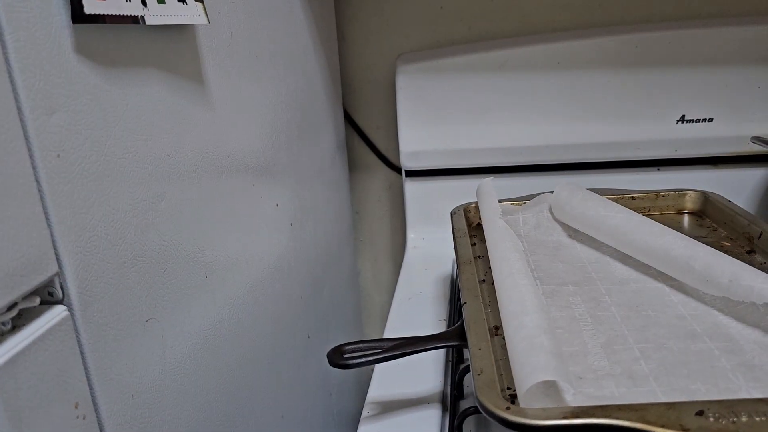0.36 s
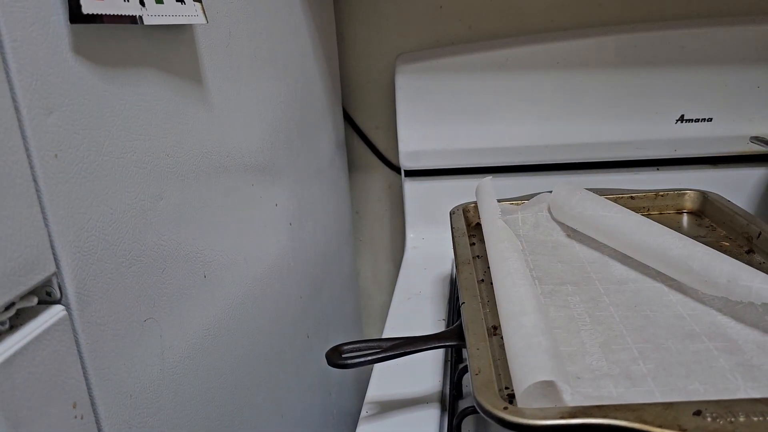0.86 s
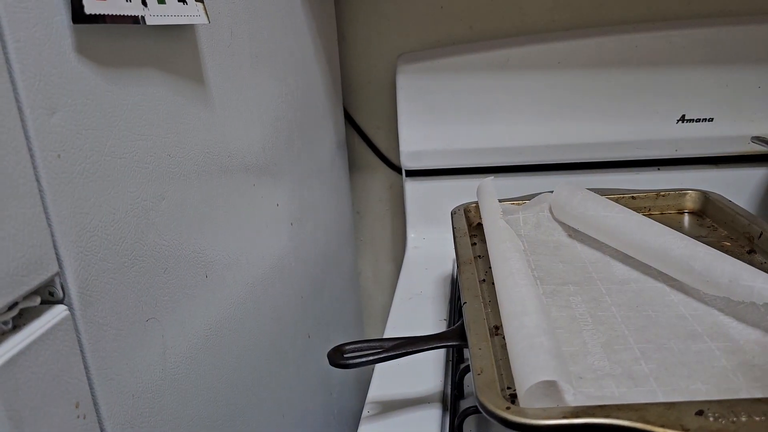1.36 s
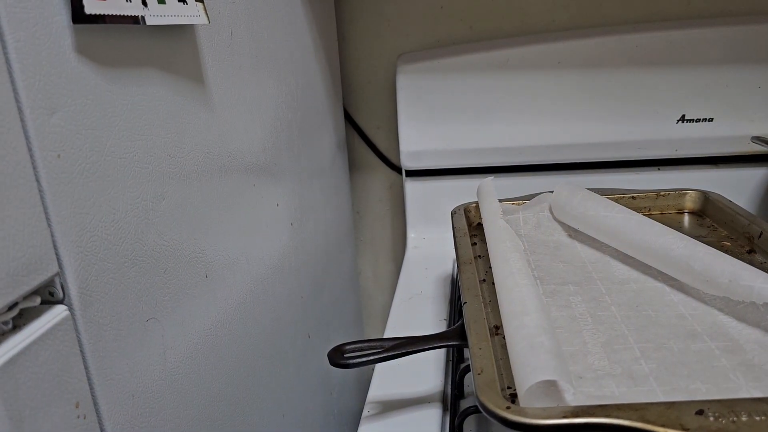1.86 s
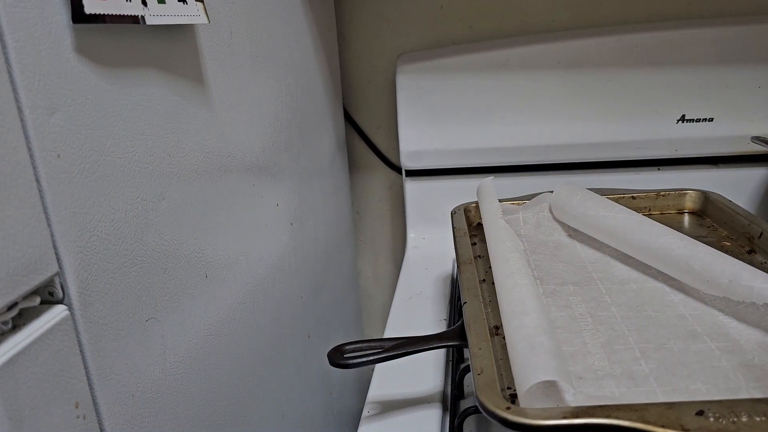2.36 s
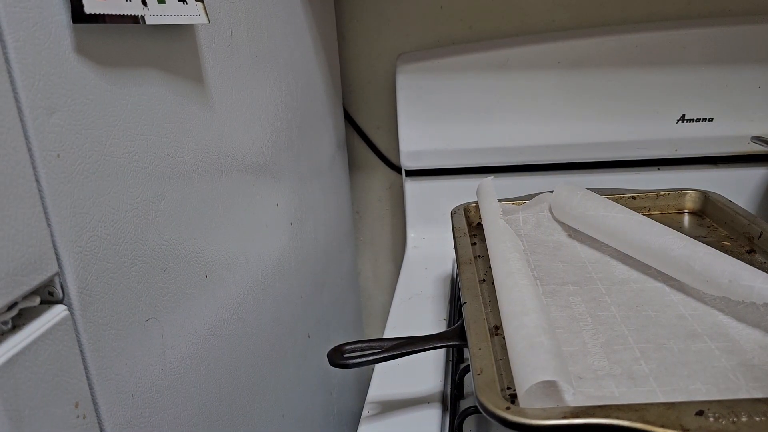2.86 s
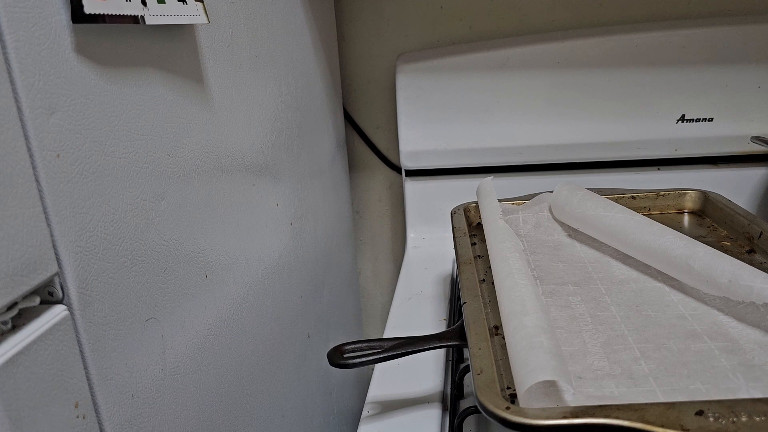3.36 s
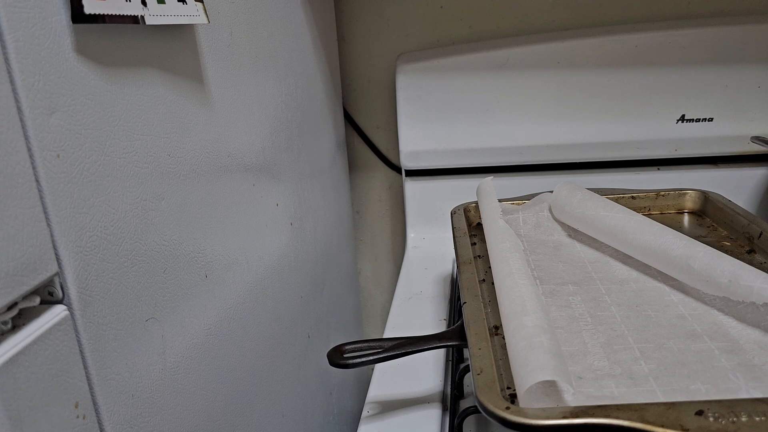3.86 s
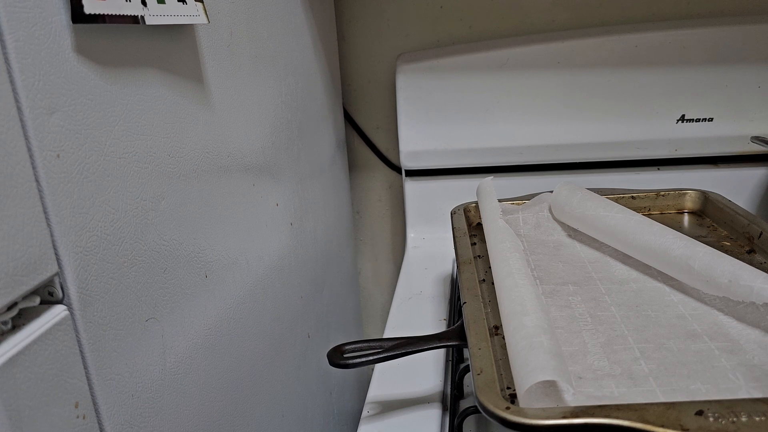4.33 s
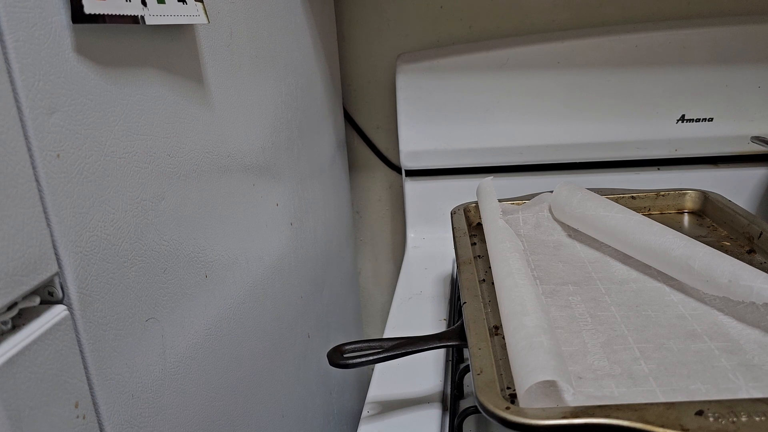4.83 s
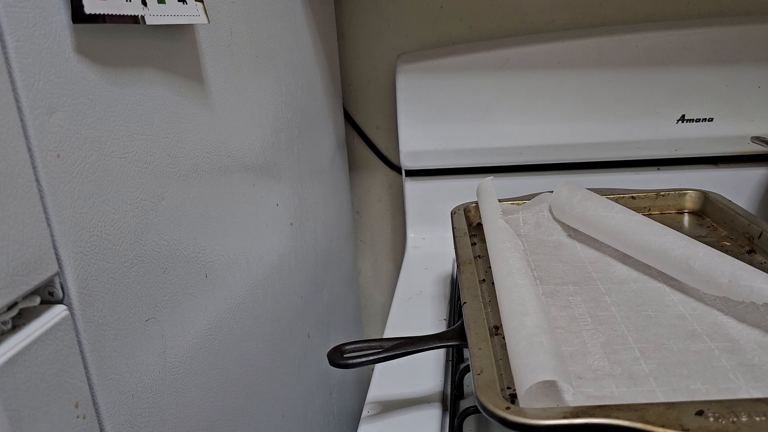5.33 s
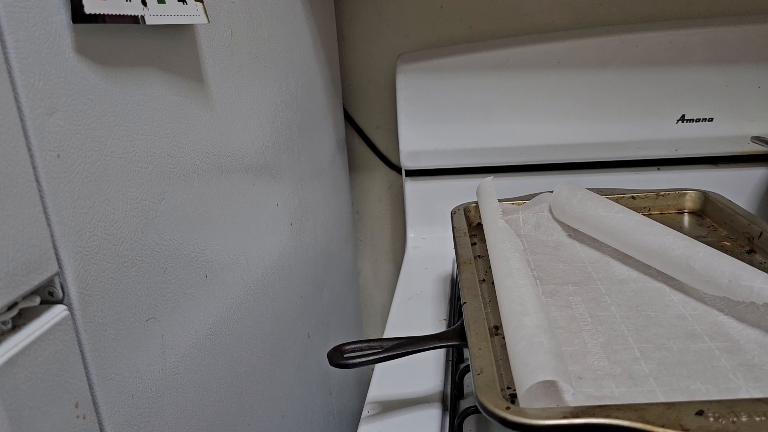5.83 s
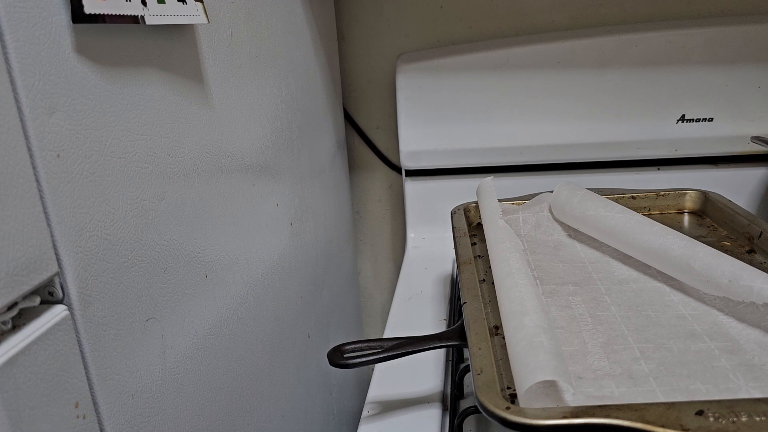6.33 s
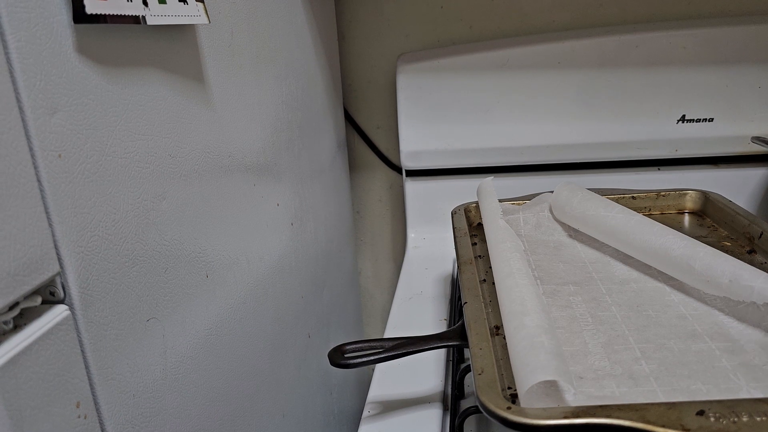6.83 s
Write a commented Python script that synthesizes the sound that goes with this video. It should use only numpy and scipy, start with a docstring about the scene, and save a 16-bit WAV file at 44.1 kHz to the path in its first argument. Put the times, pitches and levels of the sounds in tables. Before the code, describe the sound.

A small kitchen heard close up, with a faint steady fridge hum and low house rumble throughout. Paper brushes lightly at the start; at 0.3-0.5 s a metal lid clatters shut in several hard, bright blows, ringing briefly over deep thuds. A soft low push of air comes near 0.85 s, with short squeaks and shuffling from 0.8 to 1.7 s. At 1.78 s something is set down with a sharp, hollow-ringing knock. Quiet taps, clicks and paper strokes follow, with a tap at 2.56 s, a smooth sweep near 3.1 s and a click at 4.5 s. From 5.5 to 6.2 s a thin tray knocks and scrapes amid stronger rustling. A sharp tap at 6.34 s, tiny squeaks, a crisp rustle at 6.77 s and a soft thud near 6.97 s finish it. One channel is crisp and hissy, the other muffled.

```python
"""Clatter in a small kitchen

A metal lid clatters shut on a cupboard, hinges squeak and things are set down on the counter: bursts of noise,
ringing modes and gliding tones. Hands brush over paper and scrape a thin tray: noise that swells, fades and
flickers. A fridge hums in steady low tones over a rumble. One microphone port is open and its noises
are strongest near 6 kHz; the other is covered and hears the sound late and muffled."""
import sys
import numpy as np
from scipy import signal
from scipy.fft import rfft, irfft, next_fast_len
from scipy.io import wavfile

SR = 44100
rng = np.random.default_rng(int(sys.argv[2]) if len(sys.argv) > 2 else 0)


def to_wav(s):
    """Save 16-bit WAV."""
    ch = np.atleast_2d(s).T  # columns
    pcm = np.round(np.clip(ch, -1, 1) * 32767)  # PCM
    wavfile.write(sys.argv[1], SR, pcm.astype(np.int16))


def magnitude_from_level(level_db):
    """Linear magnitude for a level in decibels (20 dB per decade)."""
    exponent = np.asarray(level_db, float) / 20
    return 10 ** exponent


N = 317079   # length in samples
HZ = np.maximum(np.arange(next_fast_len(N) // 2 + 1) * SR / next_fast_len(N), 1)   # frequencies of the filters


# knocks of lid and things: t/s, level/dB at 3.5-10 kHz (scene() adds 2), then body, edge and air/dB against it
KNOCKS = [(0.0485, -49.5, -1.5, -0.5, -18), (0.1501, -44.5, -6.5, -10, -21), (0.3097, -16.5, -19, -10, -10),
          (0.3334, -28, -6.5, -18, -33), (0.378, -25.5, -27, -7.5, -9), (0.4753, -34.5, -1.5, 6, -13),
          (0.5057, -21, -10, -10, -17), (0.5124, -28, -15, -9, -12), (0.76, -37.5, -6.5, -5, -31),
          (1.7757, -26.5, -13, -3.5, -17), (2.5627, -35.5, -6.5, -6, -19), (2.7856, -52, -22, -14, -15),
          (5.0564, -59.5, 3.5, 1, -28), (5.1316, -51.5, -6.5, -8, -24), (5.5248, -27.5, -53, -12, -9),
          (5.5382, -28.5, -35, -25, -18), (5.5494, -42, -20, -26, -29), (5.726, -43.5, -6.5, -21, -13),
          (5.8065, -37.5, -18.5, -13, -12), (5.9, -32, -38, -9.5, -17), (6.1125, -35.5, -31, -5, -30),
          (6.6094, -56.5, 6, -25, -29), (6.763, -41.5, -34, -13, -8)]


def knocks():
    """Two hard things stay in contact for several ms, which makes a short burst of noise."""
    return contacts(KNOCKS, contact_ms=3.26)


# sharp clicks: t/s, level/dB at 3.5-10 kHz, then body, edge and air/dB against it
CLICKS = [(0.377, -15, -18, -10.5, -32), (0.5997, -40.5, -8, -5, -4), (1.7781, -20.5, -15.5, -3, -31),
          (1.7894, -40, -12, -13, -29), (2.136, -45.5, -5.5, -11, -23), (2.1745, -48.5, -2.5, -7, 2),
          (2.71, -55, -1, -3, -16), (3.3477, -55, -13, -14, -9), (4.138, -39.5, -12.5, -5, -40),
          (4.4777, -31, -46, -25, -38), (5.1579, -33, -36, -12.5, -44), (6.342, -26, -18.5, -4.5, -25),
          (6.9654, -49, -15, 1.5, -21.5)]


def clicks():
    """A shorter contact makes a sharper burst."""
    return contacts(CLICKS, contact_ms=1.51)


# bands of a contact, in the order main, body, edge, air, boom: low f/Hz, high f/Hz
CONTACT_BANDS = [(3500, 10300), (350, 1200), (1200, 3500), (10300, 16000), (130, 350)]
# room tail, one value for each of these bands: t60/s
TAIL_T60 = [0.29, 0.44, 0.38, 0.21, 0.64]
# strength of that tail against a contact, for each band: level/dB, before the scaling by contact time
TAIL_LEVEL = [-7, 1, -7, -6, 2.5]


def contacts(events, contact_ms):
    """Each contact is a short burst; its power then lingers as a room tail that builds up and dies by band."""
    age = np.arange(SR // 8) / SR / (contact_ms / 1000)   # counted in contact times
    burst = np.minimum(age * 1.35, 1) ** 2 * np.exp(-age)
    s, level_db, body, edge, air = np.transpose(events)
    boom = body - 5.5   # the boom follows the body, dB
    rel_db = [0, body, edge, air, boom]
    out = 0
    for k, noise in enumerate(bands(port_noise(PORT), CONTACT_BANDS)):
        start = np.zeros(N)
        start[np.round(s * SR).astype(int)] = magnitude_from_level(2 * (level_db + rel_db[k]))
        contact = np.maximum(signal.oaconvolve(start, burst)[:N], 0)
        # half the t60, because power falls twice as fast as amplitude
        tail = dying(start, TAIL_T60[k] / 2) - dying(start, 0.015)
        tail = np.maximum(tail, 0) * contact_ms / 6
        out = out + noise * np.sqrt(contact + magnitude_from_level(2 * TAIL_LEVEL[k]) * tail)
    return out


# modes of the metal lid: f/Hz, level/dB, t60/s
LID = [(551, -3, 0.078), (603, 1.5, 0.13), (650, -4, 0.15), (830, -23, 0.25), (858, -19, 0.94),
       (1284, -17.5, 0.51), (1530, -17, 0.41), (2200, -16, 0.25), (2515, -6, 0.13), (3250, -7.5, 0.11),
       (3560, -25, 0.17), (3890, -14, 0.34), (4300, -3, 0.091), (5400, -19, .27), (5430, -21, 0.2),
       (5400, -15, 0.37), (6130, -11, 0.24), (6200, -19, 0.22), (6500, -21, 0.15), (6700, 4.5, 0.13),
       (6700, -4, 0.054), (7000, -20, 0.12), (7500, 0, 0.11)]
# blows on the lid: t/s, level/dB
LID_BLOWS = [(.310, -28), (.334, -31), (.377, -45), (.476, -41.5), (.504, -36)]


def lid():
    """The lid rings in its own modes at every blow."""
    return struck(LID, LID_BLOWS)


# modes of a small stiff object struck along with the lid: f/Hz, level/dB, t60/s
LATCH = [(4605, 0, .3), (4640, -8, .2), (4718, -5, .35)]
# blows on that object: t/s, level/dB
LATCH_BLOWS = [(0.33, -32), (0.38, -50), (0.478, -34), (0.504, -38)]


def latch():
    """A small stiff object, struck along with the lid, rings in a few high modes."""
    return struck(LATCH, LATCH_BLOWS)


# modes of another struck body: f/Hz, level/dB, t60/s
BLOCK = [(528, -8, 0.46), (664, 0, 0.56), (807, 9.5, 0.24), (954, 5, 0.24), (1384, -13, 0.11),
         (1530, -3, 0.17), (1753, -3.5, 0.14), (2000, 0, 0.15), (3240, -18, 0.33), (5530, -6, 0.3),
         (5510, -4, 0.41), (6140, 0, 0.19)]
# blows on that body: t/s, level/dB
BLOCK_BLOWS = [(1.777, -39), (1.79, -45)]


def block():
    """A struck body rings mostly in low and middle modes."""
    return struck(BLOCK, BLOCK_BLOWS)


def struck(modes, blows, rattle_s=0.00077):
    """Every blow is a brief rattle that sets each mode ringing with a strength of its own."""
    s, blow_db = np.transpose(blows)
    at = np.round(s * SR).astype(int)
    chance_db = rng.normal(0, 2.5, (len(blows), len(modes)))
    swell = np.exp(-1 / (rattle_s * SR))   # the ring swells over the rattle
    out = np.zeros(N)
    for k, (hz, level_db, t60) in enumerate(modes):
        hits = np.zeros(N)
        hits[at] = magnitude_from_level(blow_db + level_db + chance_db[:, k])
        hits += 1e-18   # keeps the filters away from vanishing numbers
        r, w = magnitude_from_level(-60 / (t60 * SR)), 2 * np.pi * hz / SR
        push = signal.lfilter([1], [1, -2 * r * swell * np.cos(w), (r * swell) ** 2], hits)
        ring = signal.lfilter([1], [1, -2 * r * np.cos(w), r * r], hits)
        out += np.sin(w) * (ring - push) * magnitude_from_level(3.5 * drift(50))   # the ring is uneven, dB
    return out


# squeaks of rubbing hinges and trays: start t/s, length/s, start f/Hz, end f/Hz, level/dB (scene() adds 4.5)
SQUEAKS = [(.81, 0.19, 1065, 1039, -45.5), (1.03, 0.14, 1041, 1126, -63), (1.15, 0.23, 522, 573, -55.5),
           (1.26, 0.054, 603, 608, -57), (1.325, 0.046, 614, 598, -58), (1.38, 0.18, 523, 528, -61.5),
           (1.58, 0.079, 547, 519, -60.5), (5.85, 0.13, 547, 565, -60), (6.035, .035, 530, 530, -71),
           (6.39, 0.115, 923, 960, -55), (6.45, 0.1, 650, 610, -57), (6.47, .16, 955, 1002, -54.5)]


def squeaks(octave_db=-17, catch_db=2.8, jitter=.02):
    """Stick-slip tones with a weak octave: a quick start, a slow sag, uneven in strength and pitch."""
    attack_s, release_s, sag_db_per_s = 0.016, 0.016, 43
    out, wobble, catch = np.zeros(N), drift(67.0), drift(40)
    for k, (s, length, start_hz, end_hz, db) in enumerate(SQUEAKS):
        at = np.arange(round(s * SR), round((s + length) * SR))
        age = at / SR - s
        own = (at + k * SR) % N   # each squeak reads another stretch of the chance curves
        hz = np.linspace(start_hz, end_hz, len(at)) * (1 + jitter * wobble[own])
        phase = 2 * np.pi * np.cumsum(hz) / SR
        fade = np.clip(np.minimum(age / attack_s, (length - age) / release_s), 0, 1)
        gain = np.sqrt(2) * fade * magnitude_from_level(db - sag_db_per_s * age + catch_db * catch[own])
        out[at] += gain * (np.sin(phase) + magnitude_from_level(octave_db) * np.sin(2 * phase))
    return out


# resonances of the thin tray: f/Hz, width/Hz, level/dB
TRAY = [(760, 99, -0.5), (1894, 36, 11.5), (2950, 140, 2), (3300, 91, 3.5), (4600, 38, -5), (4670, 36, -16),
        (5900, 60, -15)]


def tray(rough):
    """While the tray is dragged, the rough noises keep its resonances sounding."""
    start_s, end_s, fade_s = 5.5, 6.2, 0.022
    t = np.arange(N) / SR
    scrape = rough * np.clip(np.minimum(t - start_s, end_s - t) / fade_s, 0, 1)
    return sum(magnitude_from_level(level_db) * resonance(scrape, hz, width_hz) for hz, width_hz, level_db in TRAY)


# hands brush paper near by: peak t/s, rise/s, fall/s, level/dB at 5-10 kHz (scene() adds 4), pressure 0-1
BRUSHES = [(0.0, .02, 0.08, -54, 0.9), (.052, .01, 0.078, -52.5, 0.63), (.174, 0.034, 0.096, -45.5, 0.97),
           (.7, 0.091, 0.13, -62, 1), (.765, 0.023, 0.17, -47.5, 0.78), (1.204, 0.059, 0.13, -52.5, .02),
           (1.342, 0.05, 0.21, -60.5, 0), (1.546, 0.61, .3, -61.5, 0.82), (1.77, 0.1, .025, -51.5, 0.4),
           (2.182, 0.22, 0.14, -56, 0.4), (2.792, 0.1, .4, -57.5, 0.4), (3.06, .2, 0.18, -58, 0.1),
           (4.6, .1, 0.15, -60, 0.3), (4.875, 0.023, 0.095, -52, .1), (5.275, .025, .1, -52.5, .02),
           (5.522, 0.016, 0.034, -46, 0.68), (5.68, 0.072, 0.091, -61, 0.6),
           (5.728, 0.027, 0.063, -53, 0.4), (5.814, 0.029, 0.13, -44, 0.42), (6.61, .05, .06, -63, 0),
           (6.766, 0.011, 0.034, -41, .02), (6.8, .03, 0.15, -54, 0.3), (6.9, 0.19, 0.26, -61.5, 0.8)]
# their colour, one row for the lightest and one for the hardest pressure: level/dB in each rustle band
BRUSH_COLOUR = [(0, -41.5, -19.5, -13, -11), (0, 0, -0.5, -12.5, 0.5)]


def brushes():
    """Power of brushing hands: a harder press adds body to the hiss."""
    return strokes(BRUSHES, BRUSH_COLOUR, rise_shape=1.38, fall_shape=1.13)


# even sweeps of a sleeve or sheet: peak t/s, rise/s, fall/s, level/dB at 5-10 kHz (scene() adds 4), pressure 0-1
SWEEPS = [(3.07, 0.11, 0.13, -50, 0.072), (3.74, 0.14, 0.12, -60, 0.34), (4.72, 0.096, 0.076, -51, .05),
          (4.89, 0.045, 0.046, -57, .1), (5.33, .09, 0.13, -58, .05), (5.86, 0.1, 0.13, -44.5, 0.49),
          (6.21, 0.22, 0.16, -48.5, 0.19)]
# their colour, one row for the lightest and one for the hardest pressure: level/dB in each rustle band
SWEEP_COLOUR = [(0, -30, -23, -9.5, -10.5), (0, 5, -1, -13, -6)]


def sweeps():
    """Power of even sweeps, with a flat top."""
    return strokes(SWEEPS, SWEEP_COLOUR, rise_shape=3.2, fall_shape=3.2)


# shuffling noises with little air: peak t/s, rise/s, fall/s, level/dB at 350-1200 Hz (scene() adds 4), dryness 0-1
SHUFFLES = [(.96, 0.038, 0.11, -51, 0.17), (1.02, 0.24, 0.27, -56.5, 0.2), (1.204, 0.029, .2, -58, 0),
            (1.745, 0.074, 0.12, -55.5, 0.4), (1.97, .05, 0.07, -64, 0.4), (2.392, 0.0093, 0.024, -68, 0.9),
            (2.5, 0.056, 0.11, -59, 0.42), (2.73, .05, 0.057, -64, .2), (3.22, 0.073, 0.048, -74, 0.3),
            (3.3, 0.012, 0.085, -67, .1), (3.95, 0.022, .12, -66, 0.2), (4.138, .012, 0.026, -59, 1),
            (4.18, .05, 0.32, -69.5, 0.84), (5.96, 0.096, 0.16, -60, 1), (6.112, 0.051, 0.076, -51.5, 1),
            (6.42, 0.047, 0.12, -66.5, 0.95), (6.585, 0.044, 0.18, -67, 0.5), (6.75, 0.1, 0.06, -66, 0.96),
            (7.136, 0.085, 0.094, -60.5, 0.55)]
# their colour, one row for the dullest and one for the driest: level/dB in each rustle band
SHUFFLE_COLOUR = [(-23, 0.0042, -11.5, -22, -17), (5, 0, -1, -27, 2.5)]


def shuffles():
    """Power of duller or drier shuffling noises with little air; the drier, the more treble."""
    return strokes(SHUFFLES, SHUFFLE_COLOUR, rise_shape=1.38, fall_shape=1.13)


def strokes(rows, colour_db, rise_shape, fall_shape):
    """Power in each rustle band: every stroke swells and fades (shape 1 = pointed, 2 = round)."""
    t, power = np.arange(0, N + 32, 32) / SR, 0
    low_db, high_db = np.array(colour_db)
    for s, rise, fall, db, share in rows:
        before = (np.maximum(s - t, 0) / rise) ** rise_shape
        after = (np.maximum(t - s, 0) / fall) ** fall_shape
        course_db = db - 20 * (before + after)   # rise and fall span 20 dB
        mix_db = low_db + share * (high_db - low_db)
        power = power + np.outer(magnitude_from_level(2 * mix_db), magnitude_from_level(2 * course_db))
    return [np.interp(np.arange(N) / SR, t, band) for band in power]


# bands of the rustle: low f/Hz, high f/Hz
RUSTLE_BANDS = [(5300, 10300), (350, 1200), (1200, 3000), (10300, 16000), (3000, 5300)]
# steady room noise in each of these bands: level/dB (scene() adds 4)
ROOM_LEVEL = [-67.5, -71, -73, -81, -73.5]


def rustle(flicker_db=1.06, snaps_per_s=60):
    """Dense rubbing noise over room noise; the rubbing flickers in all bands as fingers catch and slip."""
    snaps = (rng.random(N) < snaps_per_s / SR) * np.minimum(rng.exponential(2.3, N), 3)   # creases give way
    slow = magnitude_from_level(2 * flicker_db * (drift(97) + drift(15.0)))
    flicker = slow * (1 + dying(snaps, 0.0071)) / 1.32
    brushed, swept, shuffled = brushes(), sweeps(), shuffles()
    out = 0
    for k, noise in enumerate(bands(port_noise(PORT), RUSTLE_BANDS)):
        rubbing = (brushed[k] + swept[k] + shuffled[k]) * flicker
        out = out + noise * np.sqrt(rubbing + magnitude_from_level(2 * ROOM_LEVEL[k]))
    return out


# short bands of noise, for rubs and taps: start t/s, end t/s, f/Hz, width/Hz, level/dB
RUBS_AND_TAPS = [(0.932, 1.167, 308, 25, -61.5), (0.938, 1.058, 236.5, 50, -55.5),
                 (2.556, 2.676, 650, 346, -47.5), (3.671, 3.834, 1330, 248, -61.5),
                 (4.088, 4.423, 300, 123, -58), (4.214, 4.403, 830, 59.7, -64),
                 (5.054, 5.085, 1430, 300, -53.5), (5.126, 5.17, 1440, 300, -56),
                 (5.723, 5.76, 760, 200, -52), (6.106, 6.344, 4450, 905, -50.5),
                 (6.1, 6.318, 13900, 900, -66), (6.338, 6.359, 2330, 990, -35.5),
                 (6.375, 6.554, 1780, 890, -59.5), (6.406, 6.622, 820, 390, -56),
                 (6.961, 6.965, 2120, 250, -53), (6.956, 6.992, 332, 201, -50)]


def rubs_and_taps():
    """Short bands of noise, each with its own pitch and width, a quick start and a soft end."""
    out = np.zeros(N)
    for start, end, hz, width_hz, db in RUBS_AND_TAPS:
        at = np.arange(round((start - .1) * SR), min(round((end + .1) * SR), N))
        t, white = at / SR, rng.standard_normal(SR)[:len(at)]
        noise = rms_one(resonance(resonance(white, hz, width_hz), hz, width_hz * 2))
        fade = np.clip(np.minimum((t - start) / 0.0036, (end + 0.029 - t) / 0.087), 0, 1)
        out[at] += magnitude_from_level(db) * noise * fade
    return out


# thuds through floor and cupboard: t/s, level/dB, f/Hz, t60/s
THUDS = [(0.142, -48, 125, 0.3), (0.309, -31, 106.7, 0.55), (0.325, -31, 74.6, 0.84),
         (.495, -25, 72.3, 0.27), (.512, -31.5, 102.8, 0.57), (0.793, -42, 110, 0.4),
         (.85, -41, 89.3, 0.38), (3.279, -41.5, 89.2, 0.26), (3.465, -39.5, 86.4, 0.2),
         (5.122, -43.5, 78, 0.28), (6.968, -41, 68.5, 0.24)]


def thuds():
    """Low rings that start within a fraction of a cycle and die away."""
    t, out = np.arange(N) / SR, np.zeros(N)
    for s, level_db, hz, t60 in THUDS:
        age = np.maximum(t - s, 0)
        swell = 1 - np.exp(-age * hz * 27.0)
        out += magnitude_from_level(level_db - 60 * age / t60) * swell * np.sin(2 * np.pi * hz * age)
    return out


def door_push():
    """A door pushes the air: one slow, very low swell."""
    at_s, hz, level_db, width_s = 0.857, 25, -40.5, 0.068
    t = np.arange(N) / SR
    return magnitude_from_level(level_db) * np.sin(2 * np.pi * hz * t) * np.exp(-.5 * ((t - at_s) / width_s) ** 2)


# hum of the fridge: f/Hz, level/dB (rms, before it wavers)
HUM = [(60, -61), (120, -61.5), (180, -82)]


def fridge(waver_db=2.0):
    """Mains tones that waver in strength and phase."""
    t, out = np.arange(N) / SR, 0
    for hz, db in HUM:
        tone = np.sin(2 * np.pi * hz * t + 0.46 * drift(1.9))
        out = out + np.sqrt(2) * magnitude_from_level(db + waver_db * drift(7.1)) * tone
    return out


# colour of the house noise: f/Hz, level/dB per Hz (only the shape counts)
RUMBLE = [(15, -37), (27, 4), (40, -7), (60, -8), (90, 1.5), (120, -2.5), (200, -3.5), (330, -12),
          (500, -13.5), (900, -46)]


def house_rumble():
    """Steady low noise of the house, at -56 dB rms."""
    return magnitude_from_level(-56) * rms_one(port_noise(RUMBLE))


# colour of noise at the open port, with cavity peak, notch and upper shelf: f/Hz, level/dB per Hz
# (only the shape within a band counts)
PORT = [(130, 4), (350, -5.5), (1200, -6.5), (2000, -6), (2700, -14), (4500, -10), (5600, -10),
        (6350, -1.5), (7200, -12), (8200, -23.5), (9600, -39.5), (10300, -57.5), (11000, -45.5),
        (11800, -33.5), (15600, -32.5)]
# how alike the noise is at the two ports: f/Hz, likeness 0-1
LIKENESS = [(60, 0.81), (150, 0.99), (400, 0.23), (1000, 1), (4000, 0.097), (12000, .3)]


def port_noise(spectrum):
    """Coloured noise at both ports, combed by the walls; how alike the ports are depends on frequency."""
    a, b = rng.standard_normal((2, N))
    alike = at_hz(LIKENESS)
    other = filtered(a, alike) + filtered(b, np.sqrt(1 - alike ** 2))
    return filtered(np.array([a, other]), magnitude_from_level(at_hz(spectrum)) * walls()[0])


def walls():
    """Response of direct sound plus dying reflections, another at each port; it combs the spectrum."""
    echo_t60_s, echo_db = 0.22, -5   # near walls and cupboards
    t = np.arange(SR // 2) / SR
    echoes = rng.standard_normal((2, len(t))) * magnitude_from_level(-60 * t / echo_t60_s) * (t > .002)
    echoes *= magnitude_from_level(echo_db) / np.sqrt(np.sum(echoes ** 2, axis=1, keepdims=True))
    echoes[:, 0] = 1   # the direct sound
    return rfft(echoes, next_fast_len(N)) / np.sqrt(1 + magnitude_from_level(2 * echo_db))


def bands(noise, edges_hz):
    """The noise split into bands, rms 1 each at the open port."""
    filters = [signal.butter(3, edge, "band", fs=SR, output="sos") for edge in edges_hz]
    parts = [signal.sosfilt(sos, noise) for sos in filters]
    return [part / np.sqrt(np.mean(part[0] ** 2)) for part in parts]


def resonance(x, hz, width_hz):
    """Lets through a narrow band around one frequency, as a ringing body does."""
    r = np.exp(-np.pi * width_hz / SR)
    gain = np.array([1, 0, -1]) * (1 - r * r) / 2
    return signal.lfilter(gain, [1, -2 * r * np.cos(2 * np.pi * hz / SR), r * r], x + 1e-18)


def dying(pulses, t60):
    """Every pulse dies away to a thousandth of its value in t60 seconds."""
    return signal.lfilter([1], [1, -magnitude_from_level(-60 / (t60 * SR))], pulses + 1e-18)


def drift(rate):
    """Slow chance curve of rms about 1, drawn at every 16th sample; a higher rate (Hz) moves faster."""
    r = np.exp(-32 * np.pi * rate / SR)
    white = rng.standard_normal(N // 16 + 3002)
    slow = signal.lfilter([1], [1, -2 * r, r * r], white)[3000:]   # skips the start-up
    return np.interp(np.arange(N) / 16, np.arange(len(slow)), rms_one(slow))


def rms_one(x):
    """Scales a sound to rms 1."""
    return x / np.sqrt(np.mean(x ** 2) + 1e-20)


def at_hz(points):
    """Reads a curve of (f/Hz, value) at every filter frequency, on a log scale."""
    hz, value = np.transpose(points)
    return np.interp(np.log(HZ), np.log(hz), value)


def filtered(x, gain):
    """Applies a gain to every frequency."""
    return irfft(rfft(x, next_fast_len(N)) * gain, next_fast_len(N))[..., :N]


def scene():
    """Mixes all sources at both ports; the rings and squeaks echo from the walls."""
    rough = magnitude_from_level(2) * knocks() + clicks() + magnitude_from_level(4) * rustle()
    tonal = lid() + latch() + block() + magnitude_from_level(4.5) * squeaks()
    low = thuds() + door_push() + fridge() + house_rumble()
    return rough + tray(rough) + filtered(tonal, walls()) + rubs_and_taps() + low


# what the cover takes away: f/Hz, loss as level/dB
MUFFLING = [(60, 1), (200, 0.5), (380, 6), (700, 9.5), (1290, 14), (2380, 21), (4400, 43.5), (5800, 116),
            (6800, 124)]


def covered_port(x):
    """The cover takes away treble and delays the sound."""
    lag_s = 0.00046
    return filtered(x, magnitude_from_level(-at_hz(MUFFLING)) * np.exp(-2j * np.pi * HZ * lag_s))


def roll_off(x):
    """The treble ends steeply here."""
    return signal.sosfilt(signal.butter(12, 16540, fs=SR, output="sos"), x)


def record(dry):
    """One port stays open, the other is covered; everything from 15850 Hz up is cut."""
    ports = np.array([dry[0], covered_port(dry[1])])
    mix = filtered(ports, HZ < 15850)
    return roll_off(mix)


dry = scene()
out = record(dry)
to_wav(out)
```